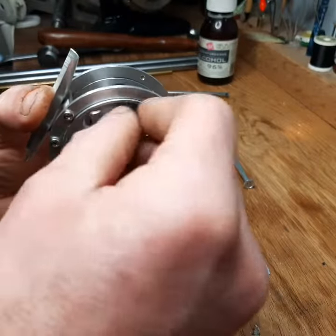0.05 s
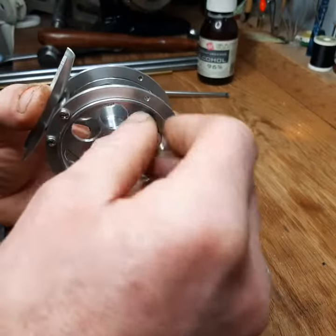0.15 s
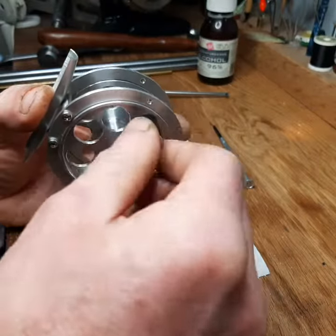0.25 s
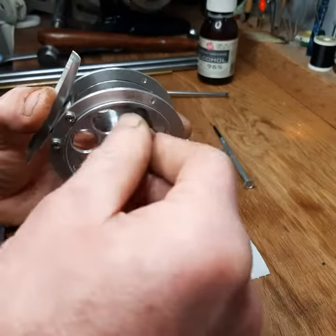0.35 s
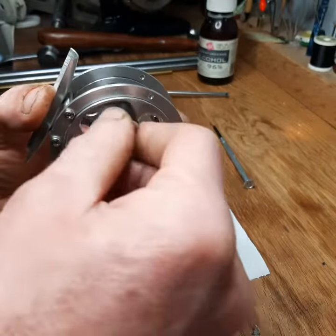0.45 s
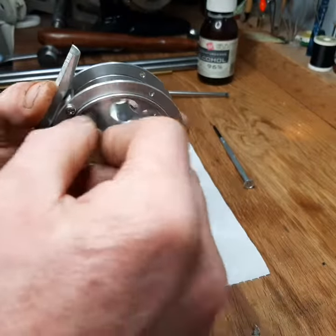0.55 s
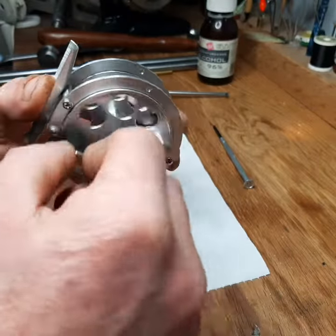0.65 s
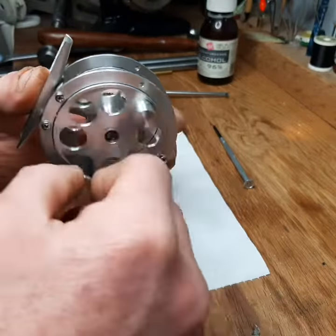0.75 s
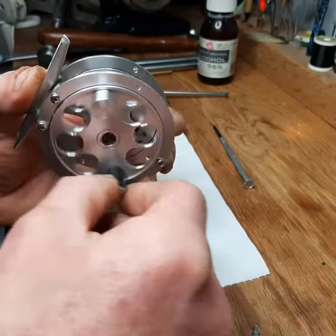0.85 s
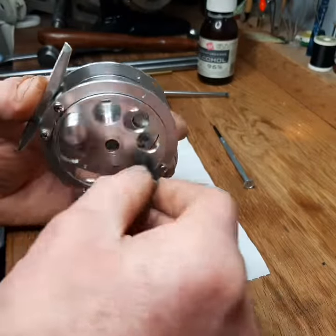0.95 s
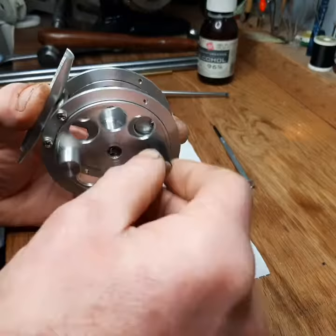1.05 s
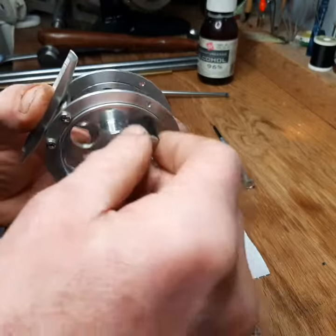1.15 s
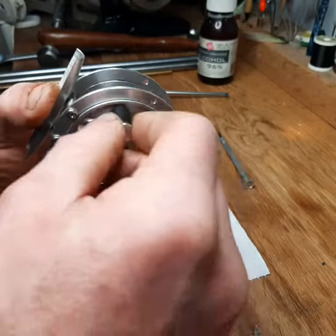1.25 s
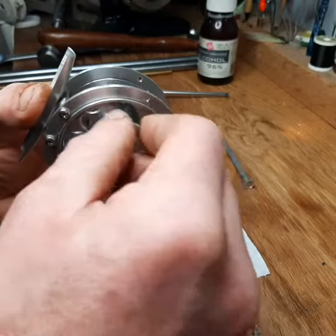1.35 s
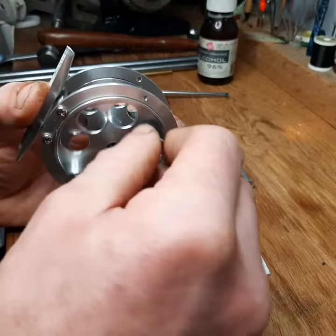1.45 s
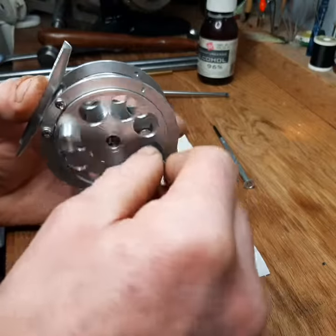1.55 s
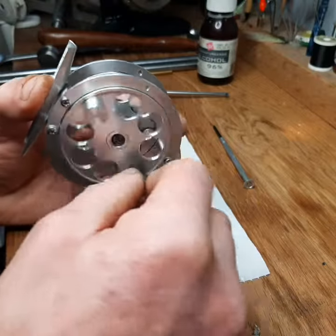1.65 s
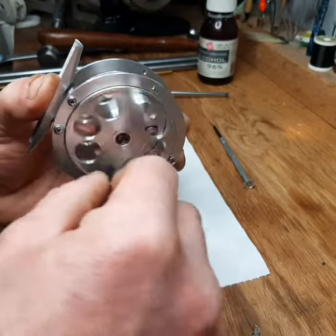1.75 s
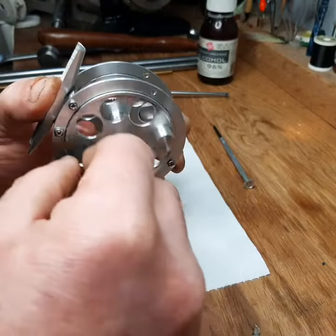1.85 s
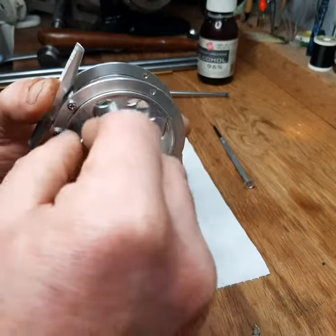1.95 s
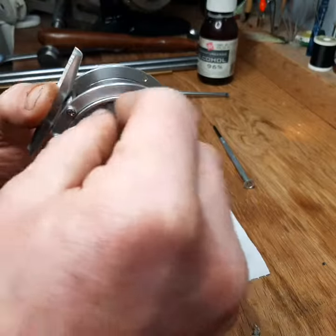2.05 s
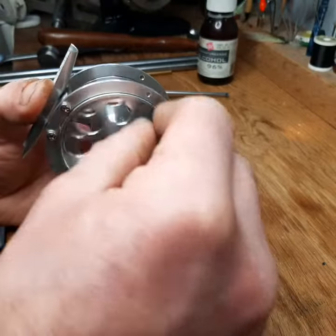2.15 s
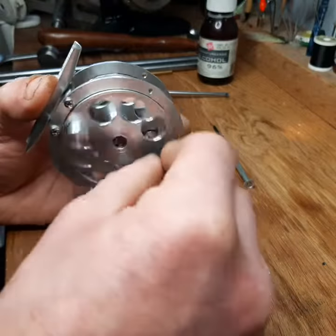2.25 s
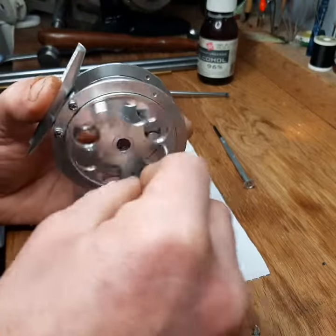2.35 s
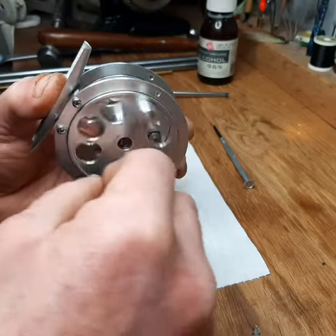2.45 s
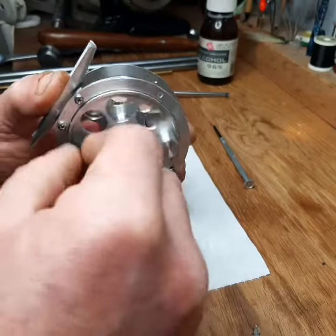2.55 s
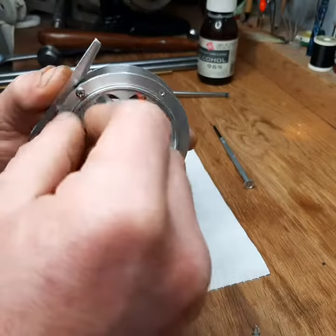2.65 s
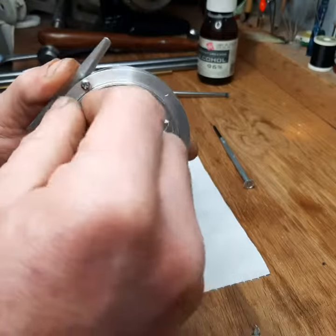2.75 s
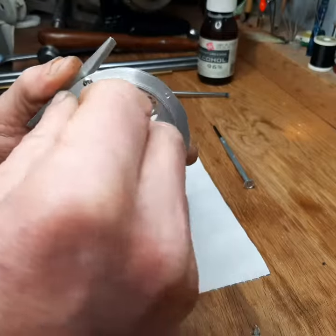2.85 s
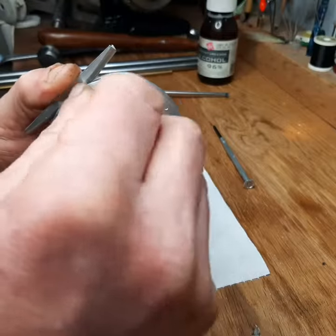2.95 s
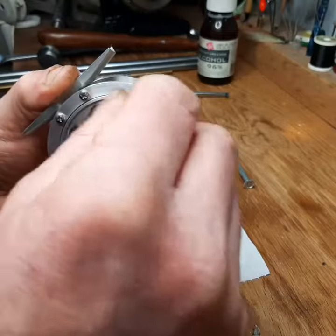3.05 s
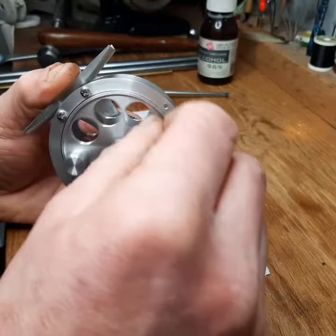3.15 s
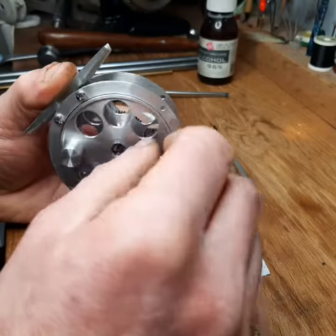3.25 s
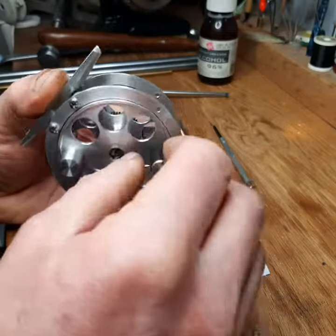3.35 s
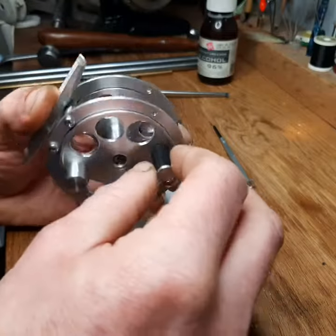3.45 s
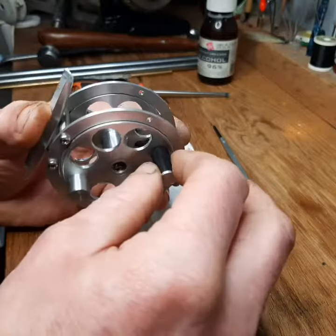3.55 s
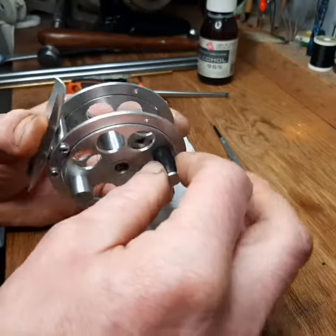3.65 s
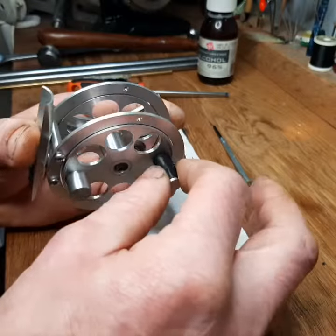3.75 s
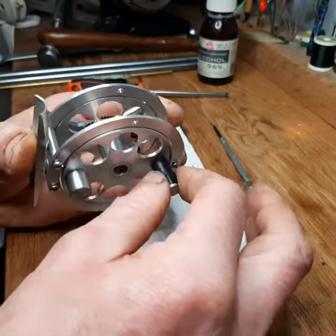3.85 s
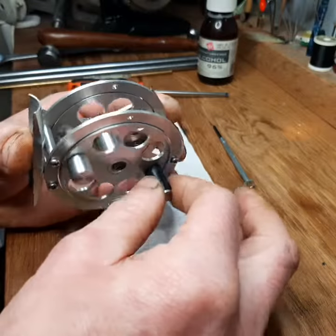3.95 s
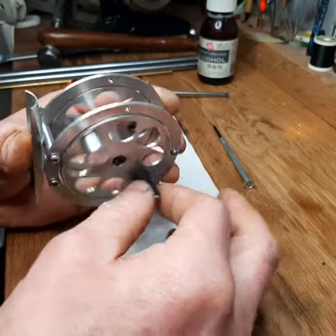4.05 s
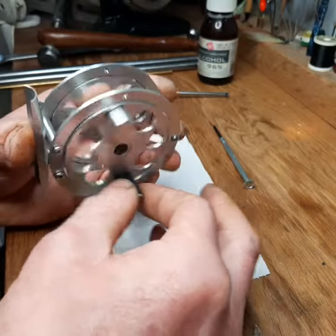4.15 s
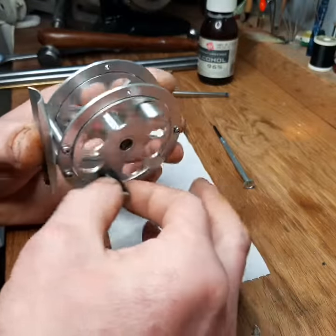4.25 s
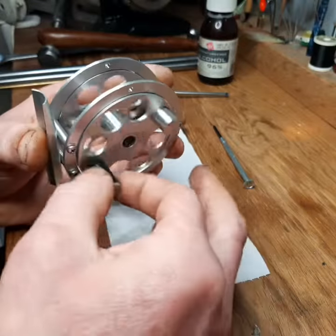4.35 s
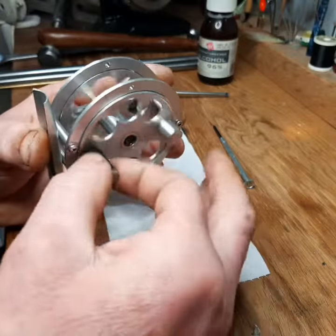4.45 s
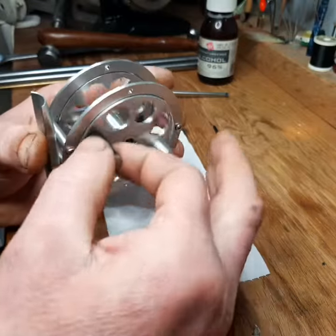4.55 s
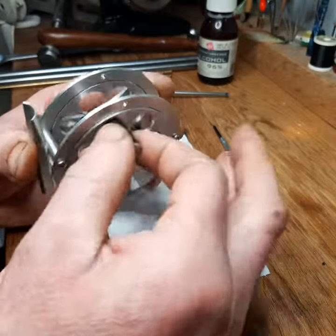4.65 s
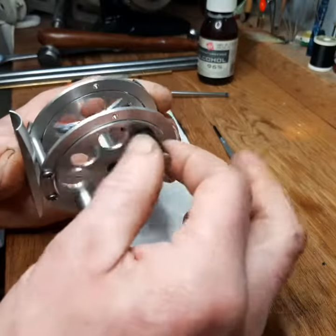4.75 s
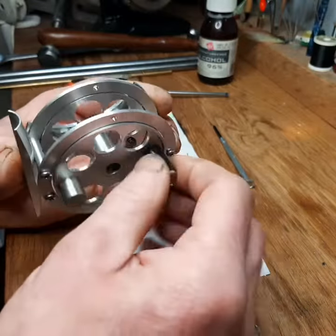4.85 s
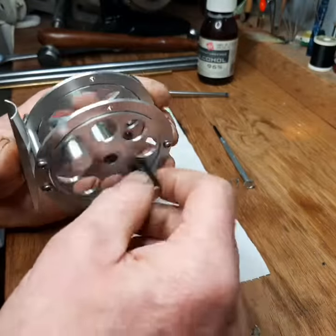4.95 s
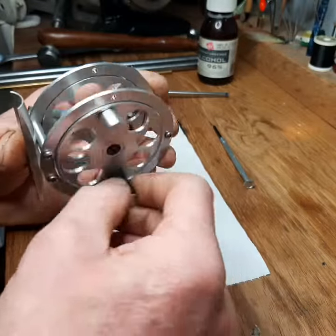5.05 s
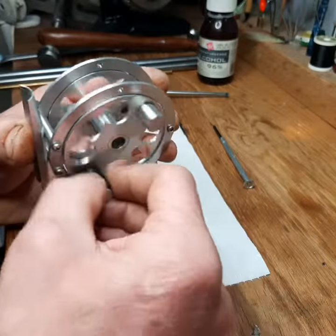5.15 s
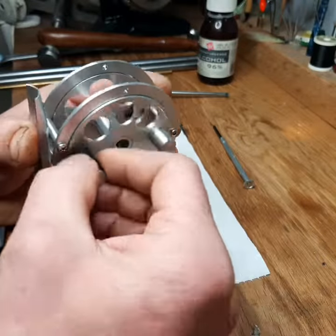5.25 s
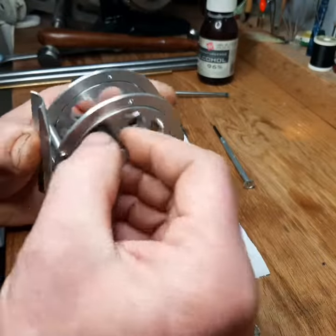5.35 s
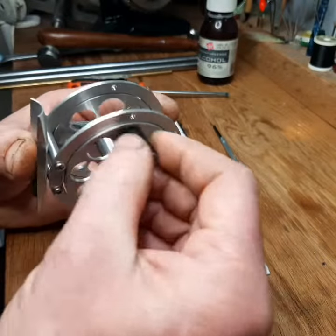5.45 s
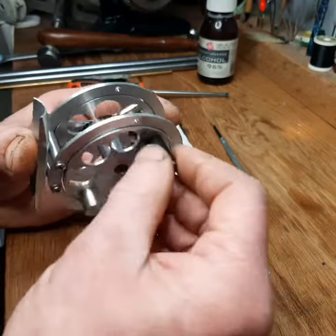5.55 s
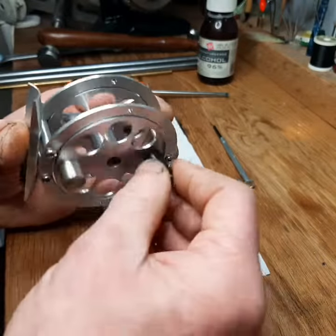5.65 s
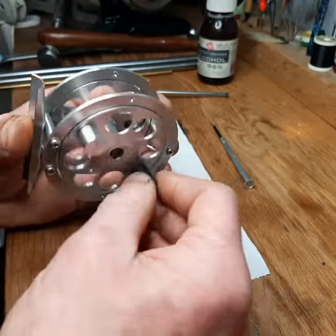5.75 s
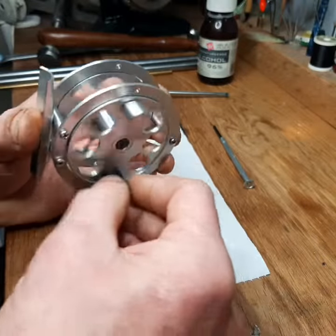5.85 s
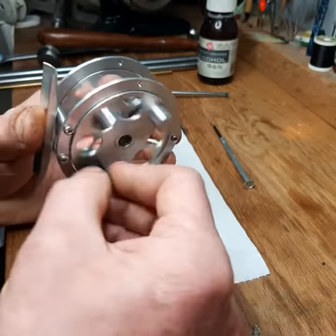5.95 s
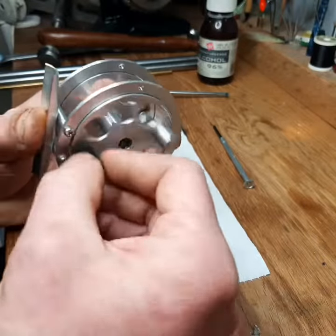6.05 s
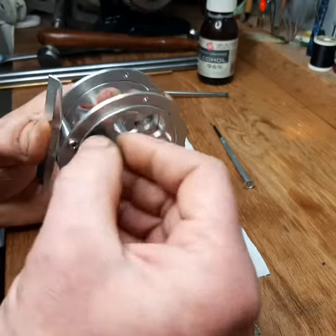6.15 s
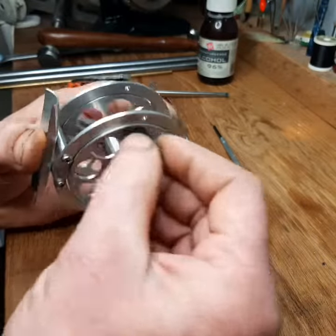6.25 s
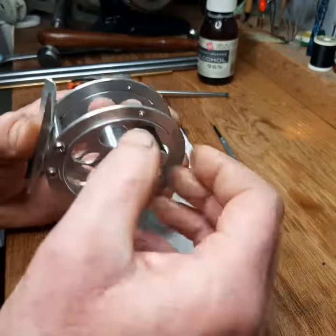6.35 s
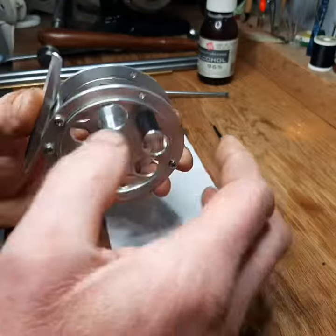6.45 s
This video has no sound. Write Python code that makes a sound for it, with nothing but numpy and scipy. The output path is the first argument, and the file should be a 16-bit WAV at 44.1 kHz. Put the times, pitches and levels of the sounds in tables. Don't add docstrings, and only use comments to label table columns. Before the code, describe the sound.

Close stereo sound of a light metal fishing reel cranked by hand in a small quiet workshop. A sprung pawl snaps over gear teeth in a bright, dry, tinny ratchet buzz, rising and slackening with each push. Short gaps separate the early pushes; around three and a half seconds it rests, then clicks back the other way, slow at first, later fast again. A faint hum and hiss lies beneath.

```python
import sys
import numpy as np
from scipy import signal
from scipy.fft import rfft, irfft, next_fast_len
from scipy.io import wavfile
from scipy.ndimage import uniform_filter1d

SR = 44100
rng = np.random.default_rng(int(sys.argv[2]) if len(sys.argv) > 2 else 0)


def field_ratio(decibels):
    return 10 ** (np.asarray(decibels, dtype=float) / 20)


def store_pcm(level_fs):
    pcm = np.round(np.clip(level_fs, -1, 1) * 32767).astype(np.int16)
    wavfile.write(sys.argv[1], SR, np.atleast_2d(pcm).T)


N = 286650
LEAD = SR // 10
SPLIT_HZ = 3750
REST_S = .09

# t/s, gear tooth reached, time per tooth/ms
FIRST_BACK = [
    (3.7792, 199, 5.6),
    (3.8517, 202, 58.5),
    (3.9092, 204, 65.4),
    (3.9833, 205, 31.8),
    (4.052, 207, 21.7),
    (4.1451, 211, 23.2),
    (4.2221, 215, 19.8),
]


def along(points, hz):
    f, v = np.transpose(points)
    return np.interp(np.log(hz + 1), np.log(f + 1), v)


def unit(x):
    return x / np.sqrt(np.mean(x ** 2) + 1e-20)


def filtered(x, response):
    m = next_fast_len(x.shape[-1] + 8192)
    spectrum = rfft(x, m) * response(np.fft.rfftfreq(m, 1 / SR))
    return irfft(spectrum, m)[..., :x.shape[-1]]


def room_floor():
    # f/Hz, density level/dB
    hiss_colour = [(15, -32), (30, -14), (65, -0.5), (110, -2), (150, -7), (260, -11), (600, -14),
                   (2000, -21), (5000, -26.5), (9000, -33.5), (12000, -20.5), (15500, -22.5)]
    # f/Hz, coherence
    alike = [
        (60, 0.66),
        (300, 0.11),
        (700, 0.18),
        (10000, 0.05),
    ]
    # f/Hz, bandwidth/Hz, level/dB
    hums = [
        (104.8, 4.1, -95),
        (190.4, 14, -92),
        (227.5, 16.4, -93),
    ]

    def mid_side(hz):
        turn = np.arccos(np.clip(along(alike, hz), -1, 1)) / 2
        return field_ratio(along(hiss_colour, hz)) * [np.cos(turn), np.sin(turn)]

    mid, side = filtered(rng.standard_normal((2, N)), mid_side)
    out = field_ratio(-78) * unit(np.array([mid + side, mid - side]))
    for centre, width, db in hums:
        band = filtered(rng.standard_normal(N), lambda hz: np.exp(-((hz - centre) / width) ** 2))
        out = out + field_ratio(db) * unit(band)
    return out


def shop(x):
    # f/Hz, t60/s
    decay = [(800, 0.27), (2000, 0.28), (5000, 0.38), (9000, 0.35), (15000, 0.32)]
    # f/Hz, level/dB
    walls = [(800, 3.5), (2500, 8), (3700, 4.5), (4250, 1.5), (4900, 0), (7000, -2.5), (8000, -4.5),
             (9000, -6), (15000, -5)]
    out = np.zeros((2, len(x)))
    t = np.arange(len(x)) / SR
    for k in range(3):
        hz, age, z = signal.stft(rng.standard_normal((2, SR // 2)), SR, nperseg=256)
        fade = field_ratio(along(walls, hz)[:, None] - 60 * age / along(decay, hz)[:, None])
        tail = signal.istft(z * fade, SR, nperseg=256)[1]
        tail = tail / np.linalg.norm(tail[0])
        turn = np.cos(np.pi * (t / .5 + k / 3)) ** 2 / np.sqrt(9 / 8)
        sent = np.pad(x * turn, (180, 0))
        out += signal.fftconvolve(sent[None], tail, axes=1)[:, :len(x)]
    return out


def crank():
    # t/s, gear tooth reached, time per tooth/ms
    forward_pushes = [
        (-0.062, 0, 14.5),
        (-0.0281, 2, 14.2),
        (0.0474, 6, 11.8),
        (0.1609, 17, 13.7),
        (0.2534, 23, 18.3),
                      (0.517, 24, 17.6),
        (0.5955, 26, 31.5),
        (0.662, 30, 10.1),
        (0.7306, 35, 19.2),
        (0.789, 39, 13.1),
        (0.8612, 45, 12.9),
        (0.9243, 49, 12.4),
        (1.0694, 60, 17.7),
        (1.1848, 67, 25.9),
                      (1.2011, 68, 22.1),
        (1.3441, 78, 23.1),
        (1.3906, 81, 15.6),
                      (1.5065, 82, 29.7),
        (1.5679, 86, 10.9),
        (1.6199, 90, 17.5),
        (1.7152, 97, 16.6),
        (1.8443, 106, 14.4),
        (1.9166, 112, 15.9),
        (1.9781, 117, 13.9),
        (2.0145, 119, 11.5),
        (2.0496, 121, 17.0),
                      (2.0713, 122, 18.7),
        (2.2071, 133, 11.9),
        (2.2979, 141, 13.7),
        (2.4373, 153, 17.8),
                      (2.4573, 154, 16.0),
        (2.5615, 162, 14.0),
        (2.7345, 174, 24.8),
        (2.79, 176, 38.6),
                      (2.9956, 177, 48.0),
        (3.0571, 180, 16.1),
        (3.0931, 182, 25.9),
        (3.2159, 190, 13.3),
        (3.2678, 194, 16.4),
        (3.348, 198, 37.9),
    ]
    # t/s, gear tooth reached, time per tooth/ms
    later_back_pushes = [
        (4.2445, 216, 23.5),
        (4.332, 221, 21.9),
        (4.3904, 224, 19.3),
        (4.447, 227, 28.7),
        (4.531, 231, 26.3),
        (4.5729, 232, 23.7),
        (4.6823, 237, 27.5),
                         (4.7093, 238, 18.1),
        (4.8235, 247, 14.2),
        (4.9209, 256, 10.5),
        (4.96, 258, 34.9),
                         (5.0005, 259, 17.6),
        (5.1239, 268, 17.6),
        (5.1954, 273, 17.5),
        (5.2713, 279, 14.1),
        (5.4174, 289, 11.5),
        (5.4699, 293, 11.0),
        (5.6073, 302, 19.2),
        (5.6586, 305, 21.1),
                         (5.6838, 306, 22.6),
        (5.7713, 312, 15.3),
        (5.908, 321, 14.4),
        (6.0125, 329, 24.3),
        (6.1093, 335, 23.3),
                         (6.1416, 336, 22.8),
        (6.2388, 342, 21.3),
        (6.3368, 350, 12.7),
        (6.4267, 357, 16.3),
    ]
    forward = forward_pushes
    backward = FIRST_BACK + later_back_pushes
    s, tooth, ms = np.transpose(forward + backward)
    k = np.arange(tooth[-1] + 1)
    j = np.minimum(np.searchsorted(tooth, k, 'right') - 1, len(s) - 2)
    span = tooth[j + 1] - tooth[j]
    u = (k - tooth[j]) / span
    through_times = s[j] + (s[j + 1] - s[j]) * u * u * (3 - 2 * u)
    return through_times + span / 1000 * u * (1 - u) * (ms[j] * (1 - u) - ms[j + 1] * u)


def pose(when):
    # t/s, snap level/dB, left-right/dB, looseness/dB
    hand = [(0, -35, 5, 7), (.25, -37, -1.5, -0.5), (.68, -33, 2, 3.5), (.88, -35, 1.5, 8),
            (1.05, -37.5, 6.5, 8.5), (1.35, -34.5, 2.5, 5.5), (1.6, -40, 7, -5), (1.98, -35, 6.5, -0.5),
            (2.42, -38.5, 7, 2.5), (2.65, -35.5, 6.5, -0.5), (3.2, -36, 0, 2.5), (3.9, -40.5, 9.5, -4),
            (4.45, -33.5, 7.5, 0), (4.8, -32.5, 5.5, 4.5), (5.03, -38, 8, 0.5), (5.45, -30, 6, 9),
            (5.85, -36, 9.5, 3.5), (6.3, -30.5, 1.5, 8)]
    # gain per hand shade/(dB/dB), gain per looseness/(dB/dB), loss per doubled tooth time/dB
    shaded = [
        (1.41, 1.28, 3.5),
        (0.75, 0.48, 0.6),
        (0.26, 0.55, 1.3),
        (0.4, 0.48, 1.3),
        (0.75, 0.43, 0.9),
    ]
    # mean level/dB, swing/dB, loudest at share of a turn
    turn_out = [
        (5, 0.6, 0.64),
        (-1.5, 2, 0.11),
        (-1.6, -0.2, 0.4),
        (-2.5, 1.2, 0.86),
        (-2.5, 1.56, 0.82),
    ]
    # mean level/dB, swing/dB, loudest at share of a turn
    turn_back = [
        (3.5, 2, 0.57),
        (-0.76, 1.4, 0.14),
        (-2.5, 0.97, 0.73),
        (-4, 1.1, 0.79),
        (-2.5, 0.94, 0.21),
    ]
    open_ref_db, brisk_ms, teeth_per_turn = -36, 14, 55
    first_db, slack_db = -5.5, -9
    grip_out, grip_back = 0.023, 0.83
    ring_out_db, ring_back_db = -3, 1.5

    s, *columns = np.transpose(hand)
    open_db, pan_db, loose_db = [np.interp(when, s, c) for c in columns]
    tooth = np.arange(len(when))
    gap = np.diff(when, prepend=when[0] - brisk_ms / 1000)
    back = tooth >= FIRST_BACK[0][1]
    spool = np.where(back, np.transpose(turn_back)[..., None], np.transpose(turn_out)[..., None])
    mean_db, swing_db, peak = spool
    shade, free, drag = np.transpose(shaded)[..., None]
    slow = np.log2(np.minimum(gap, REST_S) * 1000 / brisk_ms)
    part_db = mean_db + swing_db * np.cos(2 * np.pi * (tooth / teeth_per_turn - peak))
    part_db = part_db + shade * (open_ref_db - open_db) + free * loose_db - drag * slow
    level_db = open_db + first_db * (gap > REST_S) + slack_db * (tooth == FIRST_BACK[0][1] + 1)
    grip_ring = np.where(back, [[grip_back], [ring_back_db]], [[grip_out], [ring_out_db]])
    return level_db, pan_db, part_db, grip_ring


def drifting(count, fresh, alike):
    slow, quick = rng.standard_normal((2, len(crank()), 3, count))
    slow = unit(uniform_filter1d(slow, size=9, axis=0))
    z = np.sqrt(1 - fresh) * slow + np.sqrt(fresh) * quick
    return np.sqrt(alike) * z[:, :1] + np.sqrt(1 - alike) * z[:, 1:]


def ringing(hz, t60, gains, turns, rise, late):
    t = np.maximum(np.arange(1024) / SR - late, 0)
    modes = field_ratio(-60 * t / t60[:, None]) * np.exp(2j * np.pi * hz[:, None] * t)
    build_up = rise + 0.29 / hz[:, None] * (hz[:, None] < SPLIT_HZ)
    modes = modes * (1 - np.exp(-t / build_up)) ** 2
    for rows, edge_hz in (hz < SPLIT_HZ, 950), (hz >= SPLIT_HZ, SPLIT_HZ - 20):
        highpass = signal.butter(N=9, Wn=edge_hz, btype='high', fs=SR, output='sos')
        modes[rows] = signal.sosfilt(highpass, modes[rows])
    return np.imag((gains * np.exp(1j * turns)) @ modes)


def pawl():
    parts = [
        2400,
        4300,
        5300,
        7900,
        12000,
    ]
    # f/Hz, level/dB, left-right/dB, t60/s
    rings = [(1049, -26, 1, 0.013), (1225, -25.5, -1, 0.011), (1495, -32.5, 4, 0.022),
             (2069, -24, 1, 0.013), (2412, -24.5, 0.5, 0.019), (2731, -21, -0.5, 0.033),
             (2987, -25, 2, 0.042), (4250, 1, -1.5, 0.021), (4370, -5.5, 3, 0.023), (5256, -14, 4.5, 0.036),
             (7470, -16.5, -9, 0.011), (7875, 1, 3.5, 0.008), (8106, -0.5, 11.5, 0.0074),
             (9830, -9, 8.5, 0.011), (11590, -9.5, -4.5, 0.011), (12650, -13, 0, 0.024),
             (12000, -3, 1, 0.015), (13570, -6.5, -1, 0.041)]
    # f/Hz, level/dB
    thicket = [(800, -62), (1200, -48.5), (1800, -51.5), (2600, -35), (3500, -28.5), (4000, -13.5),
               (5600, -14.5), (6600, -18), (7500, -11.5), (8900, -16), (10000, -13.5), (12500, -10),
               (14500, -15.5), (16800, -20)]
    when = crank()
    level_db, pan_db, part_db, (grip_db, ring_db) = pose(when)
    level_db = level_db + rng.normal(0, 1.0, len(when))

    def shade(hz):
        return field_ratio([np.interp(hz, parts, row) for row in np.transpose(part_db)])[:, None]

    hz, db, lean_db, t60 = np.transpose(rings)
    lean = lean_db * np.array([[.5], [-.5]]) * pan_db[:, None, None] / 2.61
    gains = shade(hz) * field_ratio(db + lean)
    gains = gains * field_ratio(1.1 * drifting(count=len(hz), fresh=.12, alike=.6))
    turns = 0.62 * drifting(count=len(hz), fresh=0.31, alike=0.49)
    strong = ringing(hz, t60, gains, turns, rise=0.00037, late=0.0003122)

    hz = (np.arange(160) + rng.random(160)) * 100 + 800
    weak_db = along(thicket, hz)
    gains = shade(hz) * field_ratio(weak_db) * drifting(count=len(hz), fresh=0.15, alike=0.14)
    t60 = 0.019 * field_ratio(rng.normal(0, 0.67, len(hz)))
    weak = ringing(hz, t60, gains, np.zeros(len(hz)), rise=0.00036, late=0)

    gains = shade(hz) * field_ratio(weak_db + np.array([[-2], [-6]]) - 25 * (hz < SPLIT_HZ))
    gains = gains * field_ratio(2 * drifting(count=1, fresh=.3, alike=.5))
    turns = 1.26 * drifting(count=len(hz), fresh=0.16, alike=0.24)
    crack = ringing(hz, np.full(len(hz), .005), gains, turns, rise=.00003, late=0.0006864)

    ms = np.arange(strong.shape[2]) * 1000 / SR
    finger_damping = field_ratio(-grip_db[:, None, None] * np.minimum(ms, 12))
    snaps = (strong * field_ratio(ring_db)[:, None, None] + weak + crack) * finger_damping
    snaps = snaps / np.sqrt(np.mean(snaps[..., :270] ** 2, axis=2, keepdims=True))
    port_db = level_db[:, None] + (pan_db[:, None] + 1.1) * np.array([.24, -.24]) - 4
    snaps = snaps * field_ratio(port_db)[..., None]
    at = np.round(when * SR).astype(int)[:, None] + LEAD + np.arange(snaps.shape[2])
    ports = [np.bincount(at.ravel(), snaps[:, c].ravel(), N + SR)[:N + LEAD] for c in range(2)]
    return np.array(ports)


def scene():
    near = filtered(pawl(), lambda hz: np.exp(-2j * np.pi * hz * np.array([[0], [.000125]])))
    forward = np.arange(N + LEAD) < LEAD + (FIRST_BACK[0][0] - REST_S) * SR
    wet_db = np.where(forward, -11.5, -15)
    wet = shop(field_ratio(wet_db) * near.mean(axis=0) * np.sqrt(2))
    return (near + wet)[:, LEAD:] + room_floor()


def top_cut(x):
    return signal.sosfilt(signal.butter(12, 16800, fs=SR, output="sos"), x)


def record(dry):
    # f/Hz, gain/dB
    top = [
        (15600, 0.5),
        (16000, -27),
        (16500, -26),
        (16800, -34),
    ]
    mix = filtered(dry, lambda hz: field_ratio(along(top, hz)))
    return top_cut(mix)


dry = scene()
out = record(dry)
store_pcm(out)
```